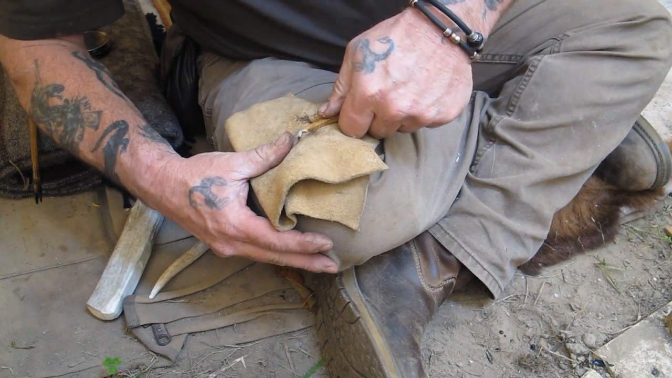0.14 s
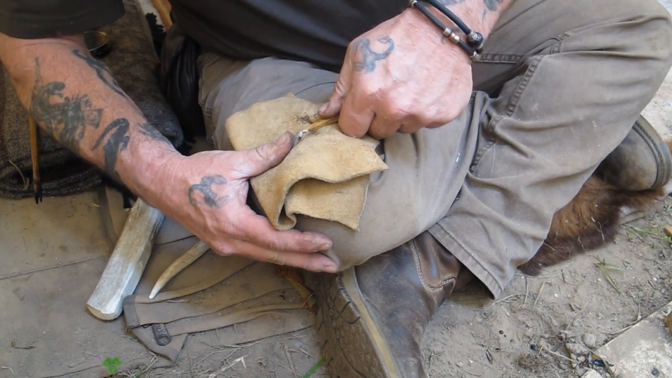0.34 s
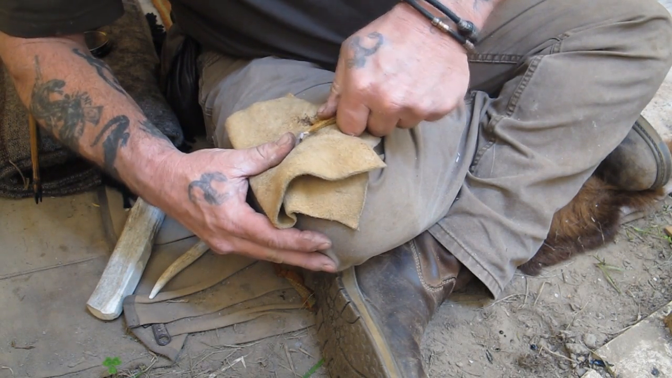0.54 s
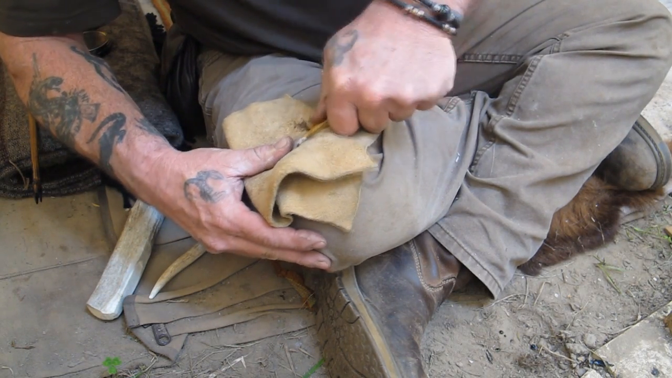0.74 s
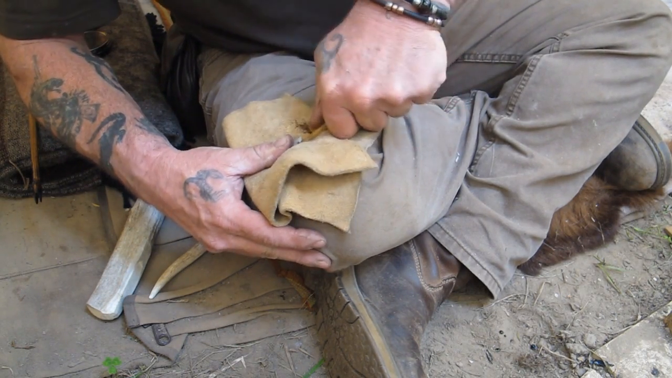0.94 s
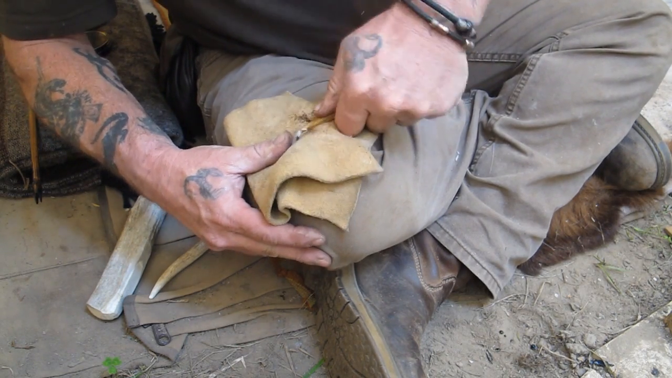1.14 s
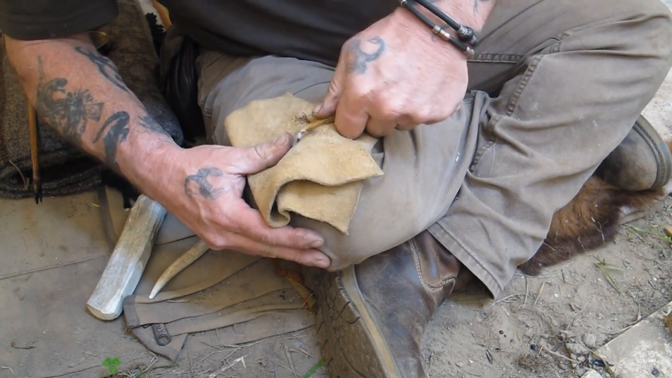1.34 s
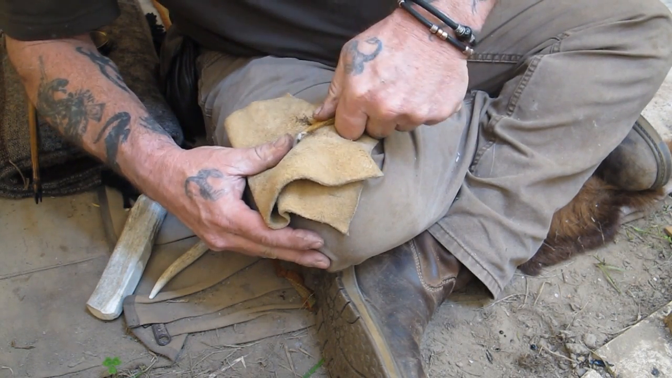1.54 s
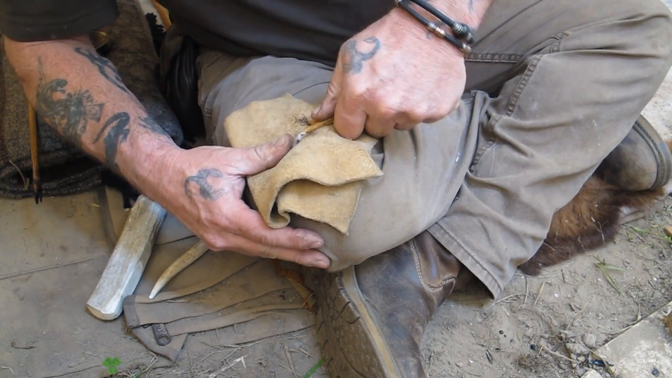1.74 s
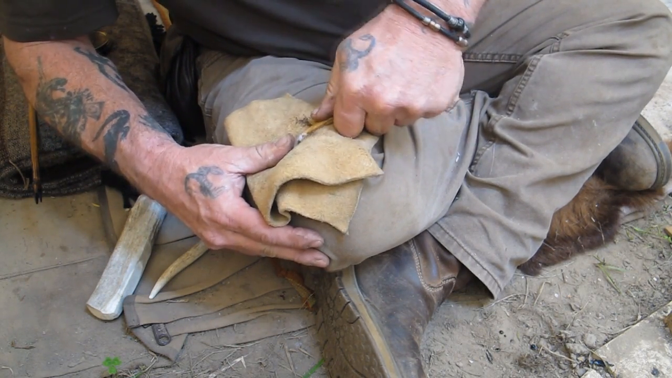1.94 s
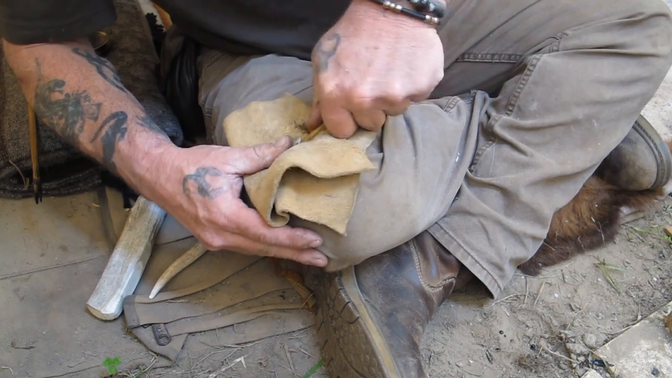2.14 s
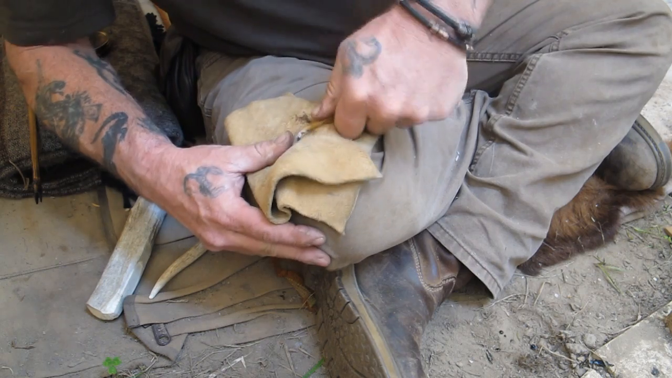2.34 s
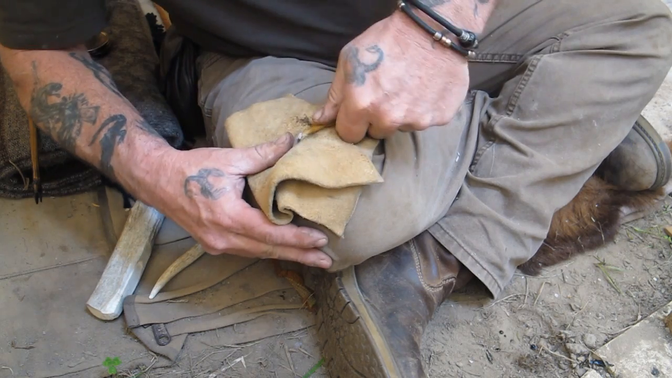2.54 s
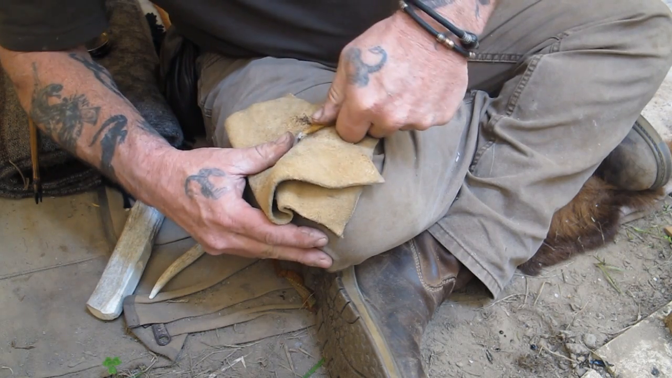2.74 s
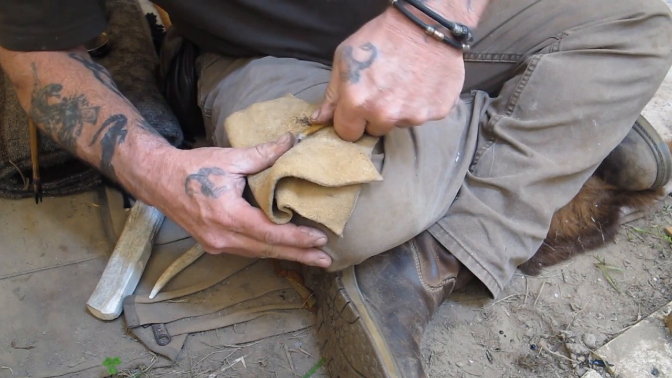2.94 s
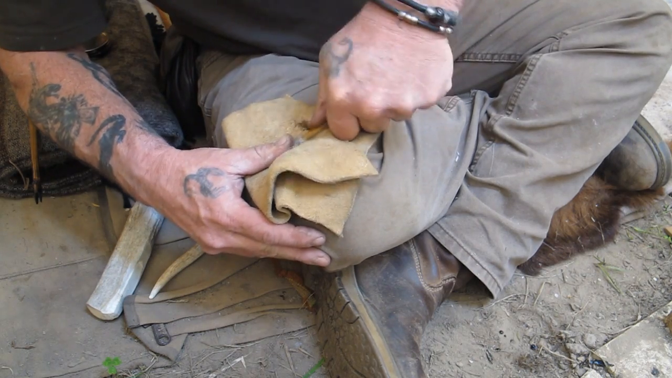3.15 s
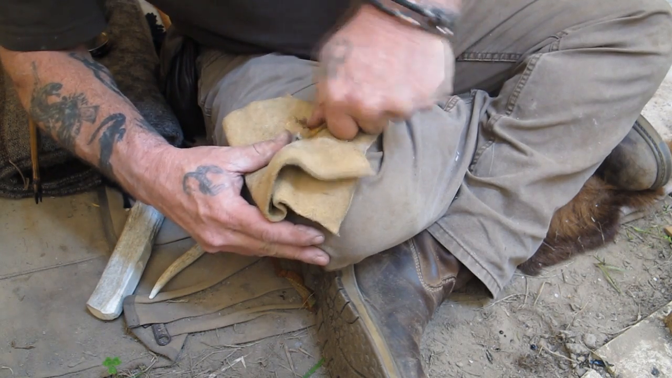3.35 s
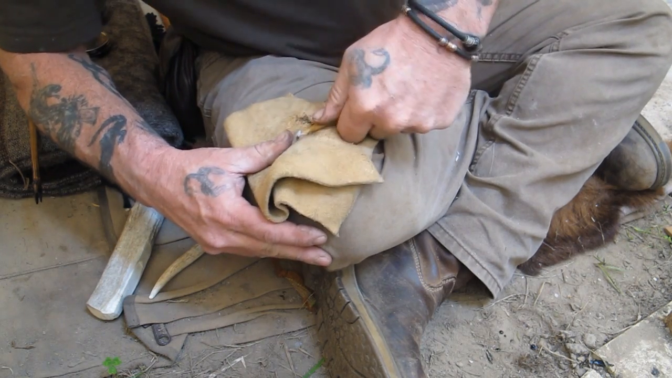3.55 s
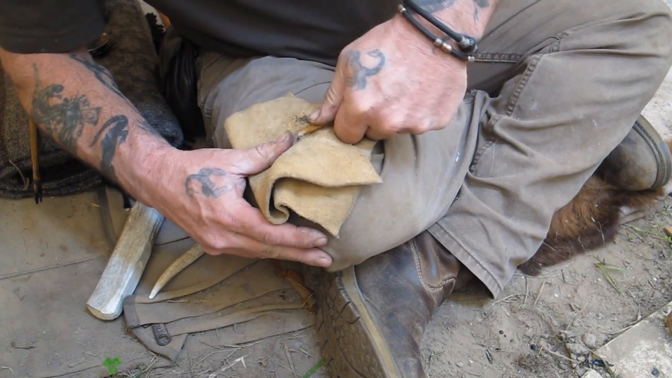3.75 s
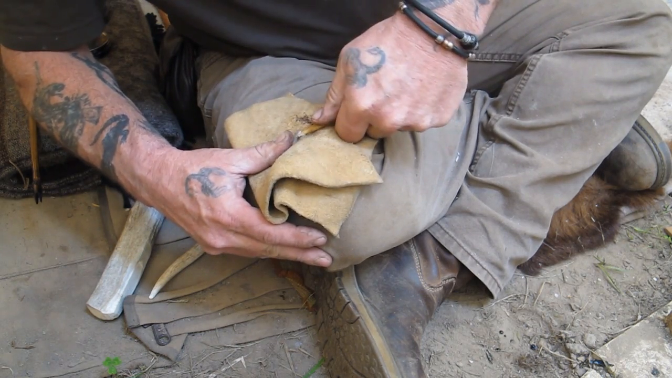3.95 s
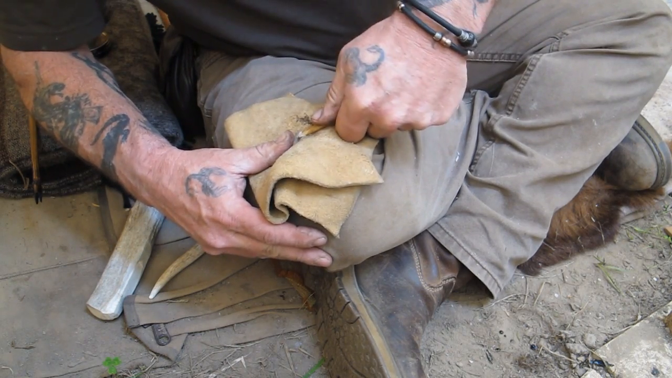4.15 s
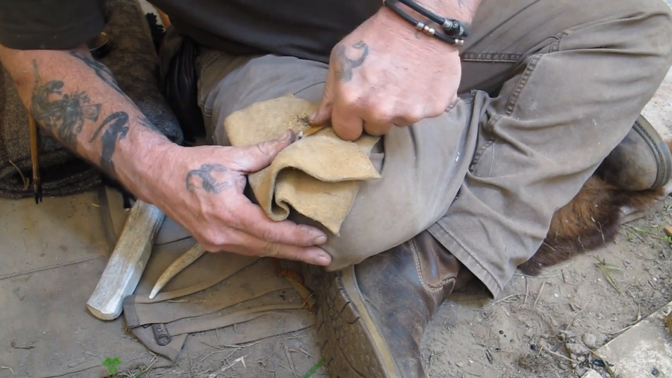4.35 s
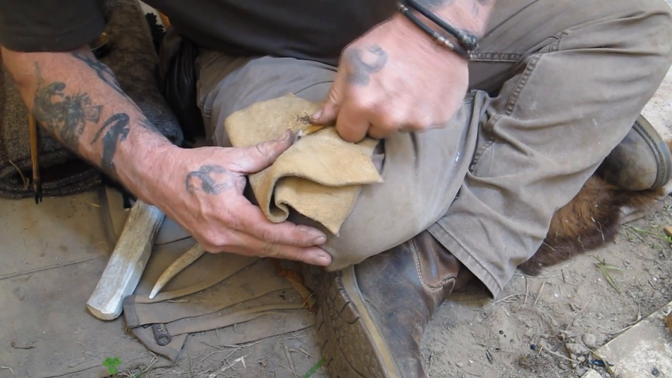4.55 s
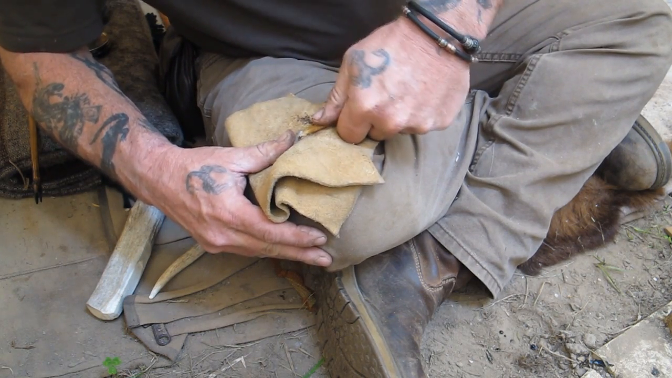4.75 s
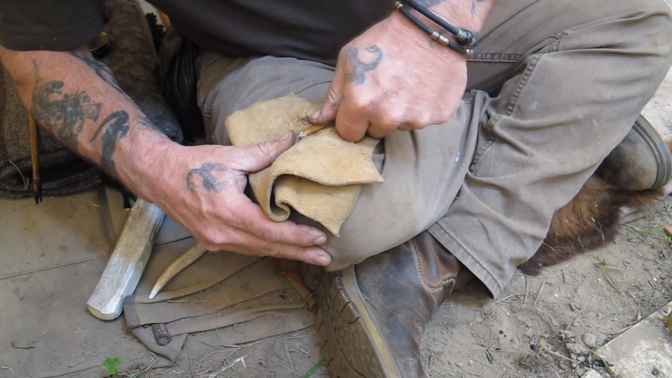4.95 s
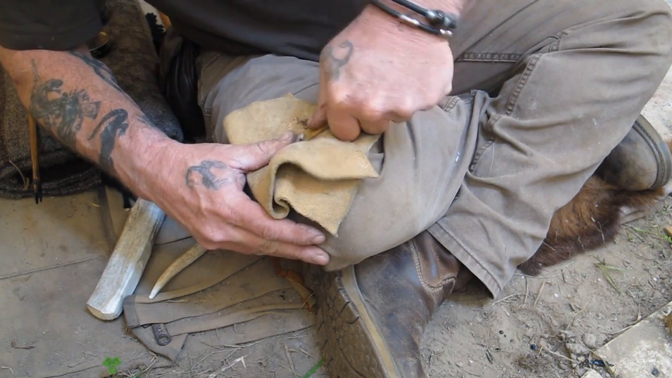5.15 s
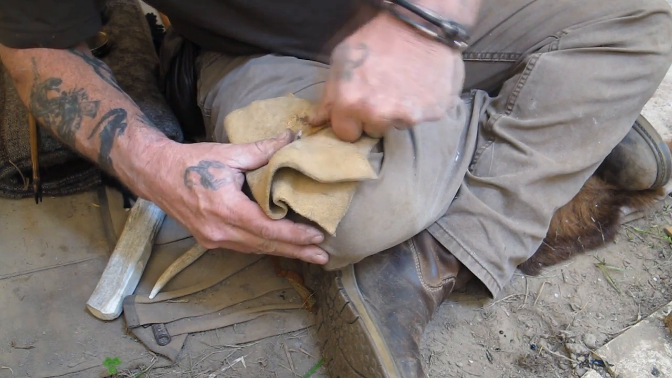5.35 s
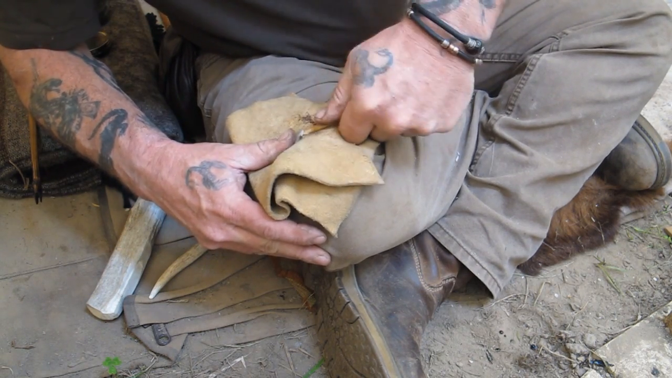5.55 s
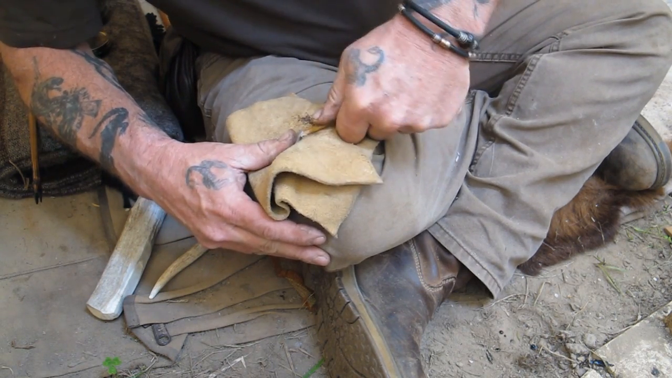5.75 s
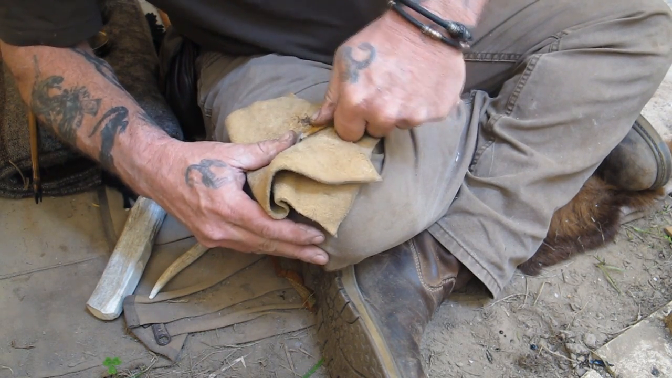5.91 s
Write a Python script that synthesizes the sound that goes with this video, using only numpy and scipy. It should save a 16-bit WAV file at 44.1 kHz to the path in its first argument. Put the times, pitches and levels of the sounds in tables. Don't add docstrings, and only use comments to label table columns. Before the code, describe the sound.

An antler tine snaps flakes off a stone point on leather, dry bright clicks with little crumbling ticks, distant road noise behind.

```python
import sys
import numpy as np
from scipy import signal
from scipy.fft import rfft, irfft
from scipy.io import wavfile

SR = 44100
rng = np.random.default_rng(int(sys.argv[2]) if len(sys.argv) > 2 else 0)


def how_loud(loudness_db):
    steps = np.asarray(loudness_db, float) / 20
    return 10 ** steps


def wrap_up_sound(samples):
    columns = np.atleast_2d(samples).T
    tamed = np.clip(columns, -1, 1)
    steps = np.round(tamed * 32767).astype(np.int16)
    wavfile.write(sys.argv[1], SR, steps)


N = 268128

# ring_hz, left_minus_right_db
GRAIN_LEAN = [(5200, -0.5), (7500, -12.5)]


def flaking():
    # pitch_hz, level_db, t60_s (time to fade by 60 dB)
    splinter_modes = [(7310, 8, 0.0013), (8800, -5.5, 0.0015), (10480, -5.5, 0.0019), (13400, -18.5, .002)]
    tine_modes = [(985, -3, 0.033), (1190, -5, 0.037), (1500, -2, .010), (1876, 6, 0.01), (2140, 2, 0.011),
                  (2630, 4.5, 0.0038), (3300, 4, 0.0077)]
    pad_modes = [(409, 4.5, 0.023), (255, -21, 0.026)]
    contacts = flake_cracks() + grit_ticks() + tip_touches()
    start_s, crack_db, ring_hz, pad_db, tine_db, splinter_db, lean_db = np.transpose(contacts)
    out = np.zeros((2, N))
    for side, (lean_share, lag_s) in enumerate([(0.54, 0.00003), (-0.44, 0.000055)]):
        s = start_s + lag_s
        level_db = crack_db + lean_share * lean_db
        flake = ringing_flakes(s, -how_loud(level_db), ring_hz)
        snap = clicks(s, -how_loud(level_db))
        splinter = body(clicks(s, -how_loud(level_db + splinter_db)), splinter_modes)
        tine = body(clicks(s, -how_loud(level_db + tine_db)), tine_modes)
        pad = body(clicks(s, -how_loud(level_db + pad_db)), pad_modes)
        out[side] += band(flake, level_db=-0.5, low_hz=2120, high_hz=9450)
        out[side] += band(snap, level_db=2.8, low_hz=2180, high_hz=5180)
        out[side] += band(splinter, level_db=-11, low_hz=5810, high_hz=11000)
        out[side] += band(tine, level_db=-19.5, low_hz=1157, high_hz=6420)
        out[side] += band(pad, level_db=-21.5, low_hz=248, high_hz=880)
    return out


def flake_cracks():
    # start_s, crack_db, ring_hz, grip_db (hold on tine and pad)
    cracks = [(0.9798, 5, 4270, 0.5), (0.9805, -9.5, 5880, -4.5), (2.1811, -18, 2330, 7),
              (2.1816, -6.5, 5560, -2.5), (2.1822, -9, 5740, -7), (2.1857, -20.5, 5900, 1),
              (2.2288, -7.5, 4870, 0), (2.2284, -19, 5040, -11), (2.23, -28, 6500, 7),
              (3.2756, -32, 4800, 3), (3.2821, 3, 3570, 0.5), (3.282, -7.5, 5710, -12),
              (3.2854, -12.5, 4570, 4), (4.379, -30, 3300, 12), (4.3793, -0.5, 3500, -5),
              (4.3815, -7.5, 4400, 6), (4.6784, -19.5, 2980, 4), (4.6851, -24.5, 4460, -3),
              (4.6910, -22, 3530, -9), (5.2408, -24, 6140, -5), (5.2441, -21, 4450, -23),
              (5.2445, -1.5, 4460, -1.5), (5.2485, -18, 6800, 2.5)]
    # first_crack_s, pad_db, tine_db, splinter_db (relative to the crack)
    flakes = [
        (0.97, -13.5, -1, -7.5),
        (2.17, 3, 3.5, -11),
        (2.22, -30, -12, 5),
        (3.27, -12.5, -0.5, -6.5),
        (4.37, -32, -7.5, -11),
        (4.67, -32, 2, -10.5),
        (5.23, 1, 0.5, -2.5),
    ]
    first_s = [flake[0] for flake in flakes]
    rows = []
    for s, crack_db, ring_hz, grip_db in cracks:
        _, pad_db, tine_db, splinter_db = flakes[np.searchsorted(first_s, s) - 1]
        rows.append((s, crack_db, ring_hz, pad_db + grip_db, tine_db + grip_db, splinter_db, 0))
    return rows


def grit_ticks():
    # start_s, crack_db, ring_hz, splinter_db
    grains = [(1.2057, -39.5, 5300, -10), (2.1225, -45, 4990, -13), (2.971, -30, 4840, -7),
              (3.1882, -40.5, 3240, 8.5), (3.2231, -25.5, 5060, 2.5), (3.3217, -17, 4940, 3),
              (3.5004, -33.5, 5170, 0), (3.655, -41, 7640, 4), (4.4423, -29, 7620, 8),
              (4.4473, -29, 4540, 4.5), (4.4865, -34.5, 4890, -8), (4.8763, -35.5, 5180, -10),
              (5.021, -41.5, 2670, 3), (5.1444, -33, 4950, 2), (5.16, -38, 5140, 0),
              (5.1719, -38.5, 4680, 1), (5.5126, -32, 2140, -12), (5.7952, -35.5, 5000, 1),
              (5.8474, -38, 7490, 3.5), (5.8517, -37, 7700, 5), (5.9802, -37.5, 7640, 0)]
    return [(s + 0.0006, crack_db, hz, -40, -7.5, splinter_db, at_hz(GRAIN_LEAN, hz))
            for s, crack_db, hz, splinter_db in grains]


def tip_touches():
    # start_s, crack_db, ring_hz, tine_db
    touches = [(0.656, -39, 6060, -8), (0.6674, -64.5, 1200, 29.5), (1.2300, -40.5, 4900, -6),
               (2.142, -35, 5080, -13), (2.3835, -35, 4600, -14), (3.0494, -42.5, 3260, -3),
               (3.5293, -50, 2180, 3), (3.9974, -35.5, 3760, 7), (4.0055, -33, 2860, 9),
               (4.0184, -33.5, 2020, -4), (5.0874, -39.5, 5250, 2), (5.995, -51, 3020, 10)]
    crumb_gap_s, crumb_loss_db, crumb_rise = 0.0045, 5.5, 1.16
    rows = []
    for s, crack_db, hz, tine_db in touches:
        lean_db = at_hz(GRAIN_LEAN, hz)
        for crumb in range(3):
            rows.append((s + 0.0006 + crumb_gap_s * crumb, crack_db - crumb_loss_db * crumb,
                         hz * crumb_rise ** crumb, -40, tine_db, -4, lean_db))
    return rows


def ringing_flakes(s, gain, ring_hz):
    length = 300
    out = np.zeros(N + length)
    for at, one_gain, hz in zip(s * SR, gain, ring_hz):
        first = int(at) + 1
        turns = (np.arange(1, length + 1) - at % 1) * hz / SR
        out[first:first + length] += one_gain * how_loud(-60 * turns / 5.0) * np.sin(2 * np.pi * turns)
    return out[:N]


def clicks(s, gain):
    at = np.asarray(s) * SR
    whole = np.clip(at.astype(int), 0, N - 2)
    out = np.full(N, 1e-18)
    np.add.at(out, whole, gain * (1 - at + whole))
    np.add.at(out, whole + 1, gain * (at - whole))
    return out


def body(x, modes):
    out = 0
    for hz, level_db, t60_s in modes:
        r = how_loud(-60 / (t60_s * SR))
        w = 2 * np.pi * hz / SR
        out = out + signal.lfilter([0, how_loud(level_db) * np.sin(w)], [1, -2 * r * np.cos(w), r * r], x)
    return out


def band(x, level_db, low_hz, high_hz):
    sos = signal.butter(2, [low_hz, high_hz], "band", fs=SR, output="sos")
    return how_loud(level_db) * signal.sosfilt(sos, x)


def resonance(x, hz, width_hz):
    r = np.exp(-np.pi * width_hz / SR)
    top = np.array([1, 0, -1]) * (1 - r * r) / 2
    return signal.lfilter(top, [1, -2 * r * np.cos(2 * np.pi * hz / SR), r * r], x)


def surroundings(x):
    length = 4096
    t = np.arange(length) / SR
    echoes_per_s, t60_s, first_gap_s, lap_s = 5000, 0.073, 0.0015, 0.021
    sparse = rng.standard_normal((2, length)) * (rng.random((2, length)) < echoes_per_s / SR)
    sparse = sparse + 0.64 * sparse[::-1]
    far_db = -11 * np.clip((t / lap_s - 1) * 2.5, 0, 1)
    echoes = sparse * how_loud(-25.5 + far_db - 60 * t / t60_s) * np.clip(t / first_gap_s - 1, 0, 1)
    echoes = signal.sosfilt(signal.butter(2, 11000, fs=SR, output="sos"), echoes)
    echoes = echoes + how_loud(7.5) * resonance(echoes, hz=6700, width_hz=620)
    echoes[:, 0] = 1
    pad_echo_s, pad_echo_db = 0.00078, -8
    echoes += how_loud(pad_echo_db) * np.clip(1 - np.abs(t - pad_echo_s) * SR, 0, 1)
    return signal.fftconvolve(x, echoes, axes=1)[:, :N]


def microphone_ports(x):
    # pitch_hz, width_hz, level_db (of the resonance added on top)
    cavities = [
        [(5346, 717, 13.5), (8600, 1500, -24)],
        [(5300, 1250, 1.5), (6230, 990, -0.5), (8700, 1300, -3)],
    ]
    out = np.array(x)
    for side, cavity in enumerate(cavities):
        for hz, width_hz, boost_db in cavity:
            out[side] += how_loud(boost_db) * resonance(x[side], hz, width_hz)
    return out


def rustle():
    # pitch_hz, level_db (per Hz)
    cloth = [(600, -6), (1500, -3), (3000, -3), (5000, 0), (7500, -6), (11000, -18)]
    t = np.arange(N) / SR
    start_s, length_s, fade_s = 0.63, 0.35, 0.022
    edge_s = np.minimum(t - start_s, start_s + length_s - t)
    return how_loud(-61 + 1.5 * drift(25)) * np.clip(edge_s / fade_s, 0, 1) * coloured(cloth)


def squeaks():
    # time_s, low_tone_db, high_tone_db
    load = [
        (2.45, -77.5, -69),
        (3.1, -69, -65.5),
        (3.5, -64, -71),
        (4.0, -63.5, -65.5),
        (4.3, -65.5, -70),
    ]
    turns, chirp_s = 13, 0.009
    bump = np.exp(-0.5 * (np.arange(-2000, 2001) / SR / chirp_s) ** 2)
    low_db, high_db = in_time(load)
    out = np.zeros(N)
    # pitch_hz, start_s, turn_s, level_db
    for hz, start_s, turn_s, level_db in [(2025, 2.62, 0.1393, low_db), (3300, 2.48, 0.146, high_db)]:
        s = start_s + turn_s * np.arange(turns)
        gain = how_loud(level_db[(s * SR).astype(int)] + 7.5 + 1.5 * rng.standard_normal(turns))
        phase = 2 * np.pi * np.cumsum(hz * (1 + 0.012 * drift(40))) / SR
        out += signal.fftconvolve(clicks(s, gain), bump, "same") * np.sin(phase)
    return out


def motor():
    # time_s, firings_per_s, level_db
    chugging = [
        (3.3, 23, -93),
        (3.45, 19.5, -59),
        (3.7, 19, -58.5),
        (3.9, 18, -59.5),
        (4.05, 22, -87.5),
    ]
    # pitch_hz, level_db, t60_s
    exhaust = [(696, -4.5, .03), (1683, -7, .02)]
    per_s, level_db = in_time(chugging)
    turns = np.cumsum(per_s) / SR
    turns -= np.interp(3.465 * SR, np.arange(N), turns)
    puffs = np.exp(-12.0 * (turns % 1)) * rng.standard_normal(N)
    return how_loud(level_db) * rms_one(body(puffs, exhaust))


def passing_cars():
    # closest_s, tyres_db, half_width_s
    passes = [
        (.75, -68, 0.28),
        (1.2, -73, 0.18),
        (2.6, -62.5, .12),
        (3.2, -70.5, 0.3),
        (3.95, -65.5, .25),
        (4.76, -62, 0.12),
        (5.5, -69.5, .6),
    ]
    # pitch_hz, level_db (per Hz)
    tyres = [(1000, -21), (1300, -9), (1700, -3), (2000, -6), (2600, -20.5)]
    t = np.arange(N) / SR
    swell = sum(how_loud(db) / (1 + ((t - s) / half_s) ** 2) for s, db, half_s in passes)
    return swell * how_loud(1.4 * drift(20)) * coloured(tyres)


def street():
    # time_s, level_db
    activity = [(0, -0.5), (.55, -1), (1.2, 2.5), (1.7, -0.5), (2.05, 0), (2.35, 1.5), (2.9, 1), (3.2, 1),
                (3.5, 5), (3.9, 2), (4.2, 1), (5.1, 1), (5.5, -1), (6.08, 1)]
    # pitch_hz, level_db (per Hz)
    rumble = [(12, -37), (20, -6), (65, -2.5), (173, -7.5), (195, -13), (238, -13), (362, -11.5),
              (392, -12.5), (500, -15), (650, -44.5), (1100, -120)]
    road = [(290, -34.5), (500, -5.5), (654, 0), (911, -3.5), (1090, -3.5), (1250, -7), (1300, -7.5),
            (2600, -12), (3380, -47.5), (5720, -120)]
    hiss = [(1530, -32.5), (2600, -5.5), (2780, -2), (3010, 0.5), (3450, -1.5), (3980, -3.5), (4330, -2),
            (4470, -0.5), (7060, -3.5), (8410, -8), (9150, -11), (9870, -9), (10600, -11), (15100, -15.5),
            (16100, -21)]
    street_db, = in_time(activity)
    out = how_loud(-53 + 0.37 * street_db + 0.72 * drift(10)) * coloured(rumble)
    out += how_loud(-58.5 + street_db + 0.95 * drift(15)) * coloured(road)
    out += how_loud(-61.5 + 0.7 * street_db + 0.5 * drift(16)) * coloured(hiss)
    return out


def whine():
    hz, width_hz = 8810, 120
    skirt = resonance(resonance(rng.standard_normal(N), hz, width_hz), hz, width_hz)
    tone = 3.0 * np.sin(2 * np.pi * hz * np.arange(N) / SR)
    return how_loud(-74.5) * rms_one(rms_one(skirt) + tone) * how_loud([[-3], [3]])


def floor():
    noise = street() + passing_cars() + rustle()
    noise[0] = np.roll(noise[0], 1)
    return noise + whine()


def coloured(spectrum):
    # pitch_hz, likeness (of left and right, 0 to 1)
    likeness = [(60, 0.98), (180, 0.84), (550, 0.85), (1650, 0.57), (4970, 0.0096), (15000, 0.12)]
    # pitch_hz, left_minus_right_db
    tilt = [(60, 0.5), (110, 1.5), (200, 0.5), (380, 0), (700, -0.5), (1290, 0.0), (2380, 1), (4400, 5),
            (8120, -7), (15000, 3)]
    hz = np.maximum(np.fft.rfftfreq(N, 1 / SR), 1)
    mid, side = rfft(rng.standard_normal((2, N)))
    alike = np.clip(at_hz(likeness, hz), 0, 1)
    lean = how_loud(at_hz(tilt, hz) / 2)
    pair = np.sqrt(1 + alike) * mid + np.sqrt(1 - alike) * side * [[1], [-1]]
    inside = (hz >= spectrum[0][0]) & (hz <= spectrum[-1][0])
    out = irfft(pair * [lean, 1 / lean] * how_loud(at_hz(spectrum, hz)) * inside, N)
    return out / np.sqrt(np.mean(out.mean(axis=0) ** 2))


def rms_one(x):
    return x / np.sqrt(np.mean(x ** 2) + 1e-20)


def in_time(rows):
    s, *columns = np.transpose(rows)
    return [np.interp(np.arange(N) / SR, s, column) for column in columns]


def at_hz(points, hz):
    table_hz, value = np.transpose(points)
    return np.interp(np.log(hz), np.log(table_hz), value)


def drift(per_s):
    knots = rng.standard_normal(int(N / SR * per_s) + 2)
    return np.interp(np.arange(N) / SR * per_s, np.arange(len(knots)), knots)


def scene():
    work = microphone_ports(surroundings(flaking()))
    return work + squeaks() + motor() + floor()


def low_pass(x):
    return signal.sosfilt(signal.butter(12, 16230, fs=SR, output="sos"), x)


def record(dry):
    limit_db, duck_share, attack_s, release_db_per_s = -3.5, 1.22, 0.012, 14
    peak_db = 20 * np.log10(np.abs(dry).max(axis=0) + 1e-9)
    over_db = np.maximum(peak_db - limit_db, 0) * duck_share
    ramp_db = release_db_per_s * np.arange(N) / SR
    held_db = np.maximum.accumulate(over_db + ramp_db) - ramp_db
    r = np.exp(-1 / (attack_s * SR))
    duck_db = signal.lfilter([1 - r], [1, -r], held_db)
    mix = np.clip(dry * how_loud(-duck_db), -1, 1)
    return low_pass(mix)


dry = scene()
out = record(dry)
wrap_up_sound(out)
```